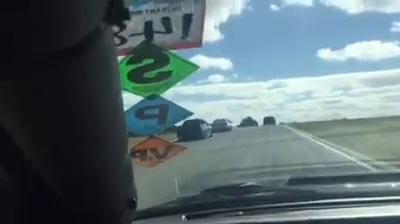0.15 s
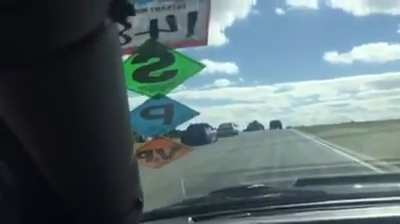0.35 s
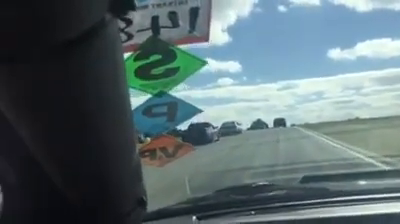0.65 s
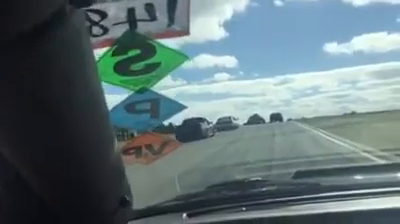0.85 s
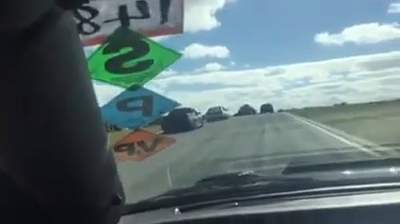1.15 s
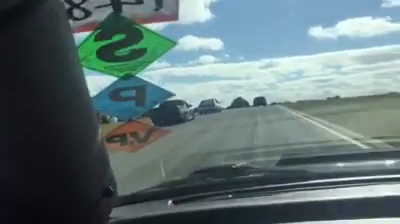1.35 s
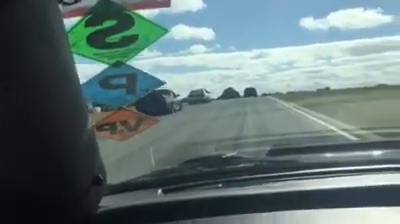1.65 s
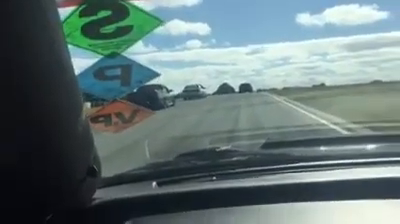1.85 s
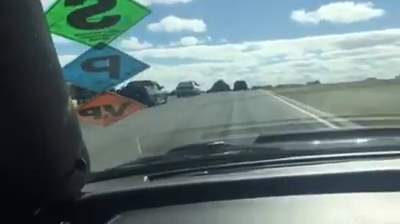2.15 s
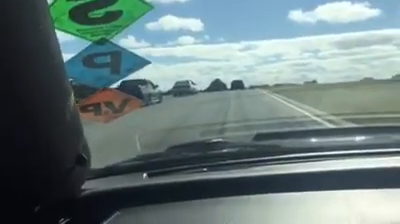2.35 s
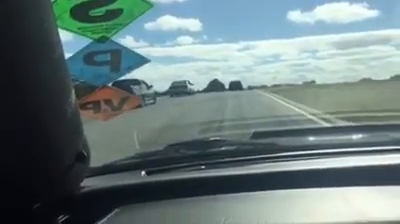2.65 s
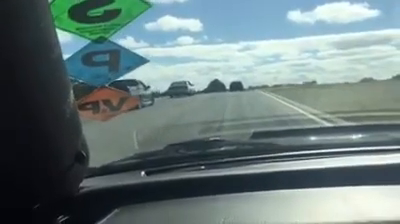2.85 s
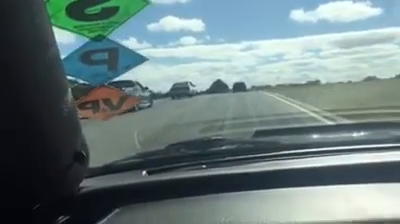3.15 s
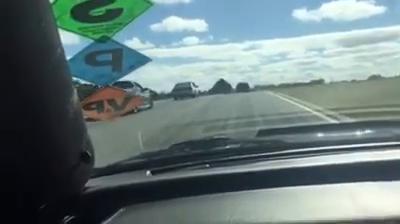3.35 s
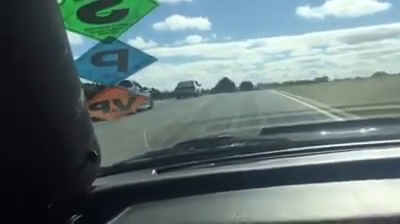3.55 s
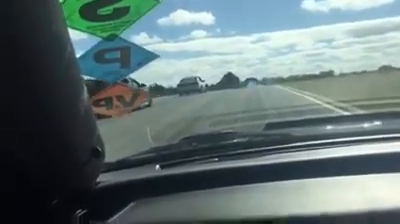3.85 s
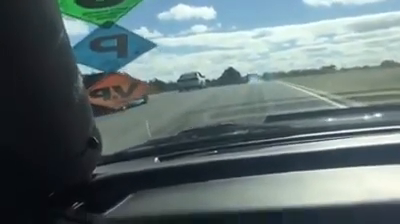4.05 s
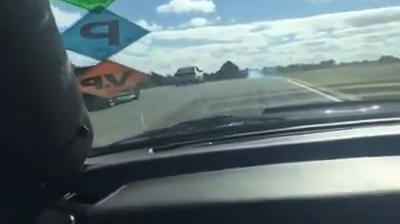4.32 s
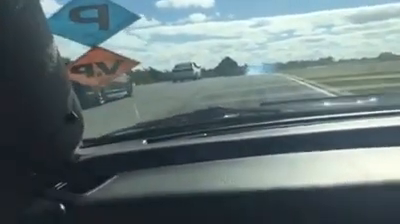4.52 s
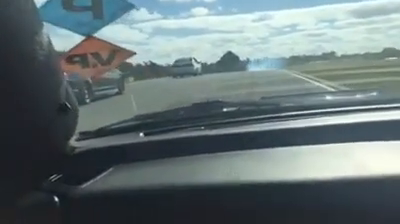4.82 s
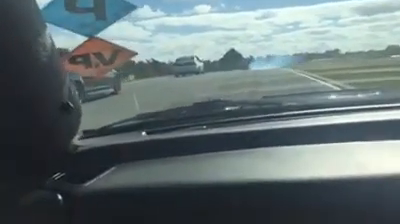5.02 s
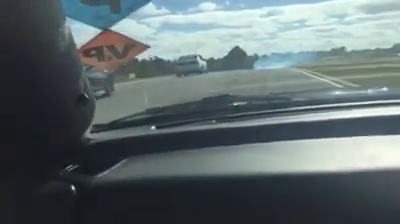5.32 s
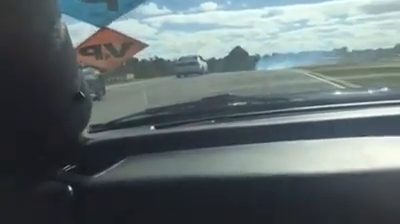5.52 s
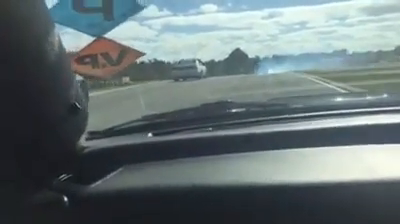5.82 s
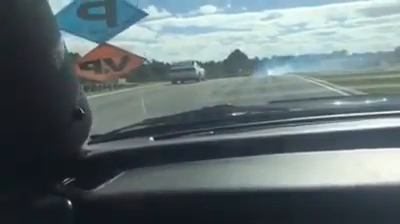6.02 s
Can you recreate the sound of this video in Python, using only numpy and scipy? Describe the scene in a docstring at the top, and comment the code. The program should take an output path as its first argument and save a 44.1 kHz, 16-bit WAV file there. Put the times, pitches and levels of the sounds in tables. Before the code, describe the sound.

A rotary engine drones continuously in a cabin, uneven pulses merging into a low, ringing buzz at nearly steady, slowly rising revs. Faint traffic roar and airy hiss gradually sink under it. After some thin gliding whistles, a neighbouring car's note sweeps upward with a short rasp, levels off and stops, leaving engine, rumble and road noise. Close, mono phone sound with little deep bass.

```python
"""Inside the cabin of a rotary-engined car on a track, the engine holds slowly rising revs.
Its three rotor faces send uneven blows into a ringing exhaust; twice a firing stumbles. Overtones are added sines.
Road roar, low rumble, traffic and wind are shaped noise. Thin whistles are gliding sines that come and go.
Another car revs up alongside and drops away: a gliding note with overtones and bursts of raspy noise."""
import sys
import numpy as np
from scipy import signal
from scipy.fft import rfft, irfft
from scipy.io import wavfile
from scipy.ndimage import uniform_filter1d

SR = 44100
rng = np.random.default_rng(int(sys.argv[2]) if len(sys.argv) > 2 else 0)


def pcm_store(signal):
    """Save signal as 16-bit PCM."""
    levels = np.round(np.clip(np.atleast_2d(signal), -1, 1) * 32767)
    wavfile.write(sys.argv[1], SR, levels.astype(np.int16).T)


def amplitude_ratio(level_db):
    """Convert a level in decibels to the matching linear amplitude (field) ratio."""
    exponent = np.asarray(level_db, float) / 20
    return 10 ** exponent


N = 272348


def curves(table):
    """Joins the rows of a table by straight lines, giving each column a value at every sample."""
    s, *columns = np.transpose(table)
    return [np.interp(np.arange(N) / SR, s, column) for column in columns]


def shape_db(points, hz):
    """Reads a spectrum in dB along a logarithmic frequency axis."""
    f, db = np.transpose(points)
    return np.interp(np.log(np.maximum(hz, 1)), np.log(f), db)


def level(x, db):
    """Sets the rms level in dB."""
    return x * amplitude_ratio(db) / np.sqrt(np.mean(x ** 2))


def causal_ring(points, size=16384):
    """Turns a spectrum into a ring that starts at once, by folding the cepstrum of its log gain."""
    hz = np.arange(size // 2 + 1) * SR / size
    cepstrum = irfft(np.log(amplitude_ratio(shape_db(points, hz))))
    cepstrum[1:size // 2] *= 2
    cepstrum[size // 2 + 1:] = 0
    return irfft(np.exp(rfft(cepstrum)))[:size // 2]


def walk(rate):
    """Smooth random wander with a spread near 1: levels held for 1 / rate seconds, averaged twice."""
    hold = int(SR / rate)
    steps = np.repeat(rng.standard_normal(N // hold + 1), hold)
    return 1.035 * uniform_filter1d(uniform_filter1d(steps, hold), hold)[:N]


def burst(start, length, rise_s, fall_s):
    """Loudness outline from 0 to 1: rise, hold, fall."""
    t = np.arange(N) / SR - start
    return np.clip(np.minimum(t / rise_s, (length - t) / fall_s), 0, 1)


def rush(points, swell_db, flicker_db, rate):
    """Coloured noise of rms 1, in octave bands that swell together and flicker alone."""
    hz = np.arange(N // 2 + 1) * SR / N
    inside = (hz > points[0][0] / 2) & (hz < points[-1][0] * 2)
    spectrum = rfft(rng.standard_normal(N)) * amplitude_ratio(shape_db(points, hz)) * inside
    octave = np.log2(np.maximum(hz, 1) / 30)
    swell = swell_db * walk(rate)
    total = np.zeros(N)
    for k in range(-1, 11):
        # neighbouring bands cross-fade
        band = irfft(spectrum * np.clip(1 - abs(octave - k), 0, 1), N)
        total += band * amplitude_ratio(swell + flicker_db * walk(rate))
    return level(total, 0)


BURST_FADE_S = 0.08


def noise_bursts(rows, hz, width_hz):
    """Noise through a narrow resonance, heard in bursts."""
    band = signal.lfilter(*signal.iirpeak(hz, hz / width_hz, fs=SR), rng.standard_normal(N))
    return level(band, 0) * sum(amplitude_ratio(db) * burst(s, n, BURST_FADE_S, BURST_FADE_S) for s, n, db in rows)


# The revs creep up. Each row: time in seconds, rotor turns per second (Hz).
REVS = [(0.05, 34.91), (0.4, 34.58), (1.71, 35.55), (1.81, 35.37), (1.92, 35.7), (2.96, 36), (4.68, 36.19),
        (4.83, 36.41), (6.12, 36.72)]


def rotor_turns():
    """Counts the rotor turns so far by adding up the turning speed."""
    turn_hz, = curves(REVS)
    return np.cumsum(turn_hz) / SR


# The rotor faces differ. Each row: relative strength of the blow in dB, lag in milliseconds.
FACES = [(0, 0), (-.55, .29), (-2.9, .43)]
# Stumbles, where the pressure wave of one firing comes reversed.
# Each row: time in seconds, share of a normal blow (negative is reversed).
MISFIRES = [(2.977, -1.25), (3.811, -1.25)]
# How exhaust and cabin answer to one blow. Each row: frequency in Hz, relative level in dB.
EXHAUST = [(20, -43.5), (36, -17), (72, 4), (107, 4.5), (143, 4), (180, -7), (215, -4.5), (255, -17.5),
           (290, -14), (325, -22.5), (430, -37.5), (600, -52.5), (2000, -82.5)]
# Clean overtones of the firing.
# Each row: multiple of the rotor turn, level in dB against the boom, share of the brightness it follows.
OVERTONES = [(9, -27, 0), (12, -47, 0), (18, -40, 0), (21, -43, 1)]
SCATTER_DB, JITTER_MS = 1.19, .04  # chance spread of each blow in size and time
BOOM_DB, BOOM_WANDER_DB = -17, 0.77
# the throttle eases, and the note settles from bright to dull
BRIGHT_START_DB, BRIGHT_END_DB, EASE_S, BRIGHT_WANDER_DB = 5, -3, 1.2, 1.5
HUM_DB, HUM_LAG_CYCLES = -11.5, .57  # level against the boom
OVERTONE_WAVER_DB = .17  # times the multiple: the high ones come and go


def exhaust_blows(turns):
    """Three blows a rotor turn ring the exhaust; each is a little off in size and time."""
    k = np.arange(0, int(len(FACES) * turns[-1]))
    chance = rng.standard_normal((len(k), 2))
    face_db, lag_ms = np.array(FACES)[k % len(FACES)].T
    late_ms = lag_ms + JITTER_MS * chance[:, 1]
    at = np.interp(k / len(FACES), turns, np.arange(N)) + late_ms * SR / 1000
    size = amplitude_ratio(face_db + SCATTER_DB * chance[:, 0])
    for s, share in MISFIRES:
        size[np.argmin(abs(at - s * SR))] *= share
    # a blow between two samples is shared by both
    blows, i = np.zeros(N + 2), np.clip(at, 0, N - 1).astype(int)
    blows[i] += size * (1 + i - at)
    blows[i + 1] += size * (at - i)
    # the ring wraps round from end to start, so it needs no run-up
    return level(irfft(rfft(blows[:N]) * rfft(causal_ring(EXHAUST), N), N), 0.75)


def engine():
    """Exhaust blows, a hum at five times the rotor turn and overtones share one wandering boom level."""
    turns = rotor_turns()
    boom_db = BOOM_DB + BOOM_WANDER_DB * walk(6)
    easing = np.exp(-np.arange(N) / SR / EASE_S)
    bright_db = BRIGHT_END_DB + (BRIGHT_START_DB - BRIGHT_END_DB) * easing + BRIGHT_WANDER_DB * walk(6)
    pipe = exhaust_blows(turns)
    # sharper blows under more throttle lift everything above the boom
    edge = signal.sosfiltfilt(signal.butter(3, 190, "high", fs=SR, output="sos"), pipe)
    hum = np.sqrt(2) * amplitude_ratio(HUM_DB + .9 * walk(12)) * np.cos(2 * np.pi * (5 * turns - HUM_LAG_CYCLES))
    overtones = np.zeros(N)
    for m, db, share in OVERTONES:
        tone_db = db + share * bright_db + OVERTONE_WAVER_DB * m * walk(2.7)
        overtones += np.sqrt(2) * amplitude_ratio(tone_db) * np.cos(2 * np.pi * m * turns)
    return amplitude_ratio(boom_db) * (pipe + (amplitude_ratio(bright_db) - 1) * edge + hum + overtones)


# Colour of the road and body roar. Each row: frequency in Hz, relative level in dB per Hz.
ROAD = [(210, -21), (360, -5), (490, -14.5), (584, -10.5), (690, -10.5), (1070, -19.5), (1850, -18),
        (3800, -30), (4240, -29.5), (4950, -43.5), (6160, -39), (10200, -54.5), (12200, -51),
        (15000, -53.5)]


def road_roar():
    """Road and body roar as flickering noise, before the colour of the cabin."""
    return amplitude_ratio(-45.5) * rush(ROAD, 0.33, 1.0, 11)


# Colour of the low rumble. Each row: frequency in Hz, relative level in dB per Hz.
RUMBLE = [(20, -11.5), (45, -7.5), (90, 0.5), (160, -7), (250, -14), (330, -21), (450, -38.5)]


def low_rumble():
    """Low road rumble as noise with strong slow swells."""
    return amplitude_ratio(-29.5) * rush(RUMBLE, 1.4, 2.0, 6.5)


# Colour of the traffic roar. Each row: frequency in Hz, relative level in dB per Hz.
ROAR = [(300, -1.5), (500, 3.5), (900, -0.5), (1400, 0), (2000, -6.5), (3000, -12), (5000, -30)]
ROAR_START_DB, ROAR_FALL_DB_PER_S = -39.5, 1.82
# the other car lifts off: the roar ducks, then this rise works against its steady fall
LIFT_S, LIFT_OVER_S, LIFT_DROP_DB, ROAR_BACK_DB_PER_S = 4.5, 0.12, -7.5, 4
RASP_LIFTS_ROAR_DB = 1.5


def traffic_roar():
    """Noise that sinks as traffic draws away, lifts with the other car's rasp and ducks when it lifts off."""
    t = np.arange(N) / SR
    lifted = np.clip((t - LIFT_S) / LIFT_OVER_S, 0, 1)
    roar_db = ROAR_START_DB - ROAR_FALL_DB_PER_S * t
    roar_db = roar_db + lifted * (LIFT_DROP_DB + ROAR_BACK_DB_PER_S * (t - LIFT_S))
    rasping = sum(burst(s, n, BURST_FADE_S, BURST_FADE_S) for s, n, _ in RASPS)
    return amplitude_ratio(roar_db + RASP_LIFTS_ROAR_DB * rasping) * rush(ROAR, 0.96, 1.0, 9)


# Colour of the wind hiss. Each row: frequency in Hz, relative level in dB per Hz.
WIND = [(2000, -14.5), (3500, -3), (4400, -3), (5500, -3.5), (6500, -7), (8000, -12.5), (10400, -13.5),
        (12000, -12.5), (15000, -16.5)]
# The hiss throbs with the engine. Each row: multiple of the rotor turn, depth from 0 to 1.
THROB = [(2, .12), (3, .1), (4, .08)]
WIND_START_DB, WIND_FALL_DB_PER_S = -53.5, 1.78


def wind():
    """Wind hiss that dies down until the other car lifts off, with a throb and short puffs at the seals."""
    t = np.arange(N) / SR
    wind_db = WIND_START_DB - WIND_FALL_DB_PER_S * np.minimum(t, LIFT_S)
    turns = rotor_turns()
    throb = 1 + sum(depth * np.cos(2 * np.pi * m * turns) for m, depth in THROB)
    puffs_db = 2.6 * np.maximum(walk(45) - .5, 0)
    return throb * amplitude_ratio(wind_db + puffs_db) * rush(WIND, 0.7, 0.31, 18)


# Resonances and cancellations of the cabin at the microphone.
# Each row: frequency in Hz, width in Hz, boost or cut in dB.
CABIN = [(568, 27, -3.5), (932, 120, 4.5), (1380, 800, 0), (2536, 210, -1.5), (2910, 87, -2),
         (3820, 250, -2), (4500, 740, 1.5), (4970, 350, -4), (10400, 370, -2.5)]
ECHO_DB, ECHO_T60_S = -12, .12


def cabin(x):
    """Colours sound in the closed cabin; dense short reflections off glass and trim ripple the spectrum."""
    hz = np.arange(N // 2 + 1) * SR / N
    t = np.arange(SR // 8) / SR
    tail = rng.standard_normal(len(t)) * np.exp(-np.log(1000) * t / ECHO_T60_S)
    reflections = amplitude_ratio(ECHO_DB) * rfft(tail / np.linalg.norm(tail), N)
    echo = (1 + reflections) / np.sqrt(1 + amplitude_ratio(2 * ECHO_DB))
    colour_db = sum(db / (1 + (2 * (hz - f) / width) ** 2) for f, width, db in CABIN)
    return irfft(rfft(x) * echo * amplitude_ratio(colour_db), N)


# A band of noise swells now and then, likely distant cars.
# Each row: start in seconds, length in seconds, level in dB.
SWELLS = [(-.2, .7, -46.5), (4.45, .45, -54.5), (5.3, .5, -57.5)]


def distant_swells():
    """Narrow noise around 935 Hz that swells up and fades."""
    return noise_bursts(SWELLS, 935, 130)


# Thin whistles.
# Each row: start in seconds, length in seconds, pitch in Hz, glide in Hz per second, level in dB.
WHISTLES = [(.98, .64, 1402, 0, -52), (1.64, .31, 1400, 30, -55), (1.94, .32, 1397, -90, -53),
            (1.58, .34, 1527, 150, -47), (1.92, .17, 1558, 100, -55)]


def whistles():
    """Gliding sines that swell slowly, waver and stop short."""
    t = np.arange(N) / SR
    total = np.zeros(N)
    for s, n, hz, glide, db in WHISTLES:
        outline = burst(s, n, .3 * n, .05)
        cycles = (hz + glide * (t - s) / 2) * (t - s)
        total += np.sqrt(2) * amplitude_ratio(db + 1.5 * walk(25)) * outline * np.sin(2 * np.pi * cycles)
    return total


# The other car. Each row: time in seconds, firing rate in Hz, level in dB.
RIVAL = [(2.82, 230, -39), (2.95, 266, -35), (3.08, 303, -39), (3.25, 347, -47), (3.52, 406.8, -43),
         (3.66, 432, -51), (3.8, 452, -43), (3.97, 463, -46), (4.5, 458, -48)]
# Its overtones, heard in the first rasp. Each row: multiple of the firing rate, level in dB.
RIVAL_ORDERS = [(2, -54), (3, -56)]
# Its exhaust rasp, in two bursts. Each row: start in seconds, length in seconds, level in dB.
RASPS = [(2.998, .55, -50.5), (4.099, .35, -54.5)]
RIVAL_WAVER_DB = 1.5  # overtones waver by this times their multiple


def rival():
    """The other car's firing note follows its revs; overtones and narrow noise make the exhaust rasp."""
    hz, db = curves(RIVAL)
    phase = 2 * np.pi * np.cumsum(hz) / SR
    start, end = RIVAL[0][0], RIVAL[-1][0]
    note = burst(start, end - start, .05, .05) * amplitude_ratio(db + RIVAL_WAVER_DB * walk(25)) * np.sin(phase)
    rasping = burst(*RASPS[0][:2], BURST_FADE_S, BURST_FADE_S)
    upper = sum(amplitude_ratio(d + m * RIVAL_WAVER_DB * walk(25)) * np.sin(m * phase) for m, d in RIVAL_ORDERS)
    return np.sqrt(2) * (note + rasping * upper) + noise_bursts(RASPS, 1320, 100)


def scene():
    """Adds all sources; road roar, traffic and wind pass through the colour of the cabin."""
    coloured = cabin(road_roar() + traffic_roar() + wind())
    mix = engine() + coloured + low_rumble() + distant_swells() + whistles() + rival()
    return mix[None]  # one channel


def low_pass(x):
    """Removes everything above the highest recorded frequency."""
    return signal.sosfilt(signal.butter(12, 15170, fs=SR, output="sos"), x)


def record(dry):
    """The phone cuts the lowest bass, below 32.3 Hz, and the top, above 15300 Hz."""
    bass_cut = signal.sosfiltfilt(signal.butter(2, 32.3, "high", fs=SR, output="sos"), dry)
    finished = signal.sosfilt(signal.ellip(8, .2, 70, 15300, fs=SR, output="sos"), bass_cut)
    return low_pass(finished)


dry = scene()
out = record(dry)
pcm_store(out)
```